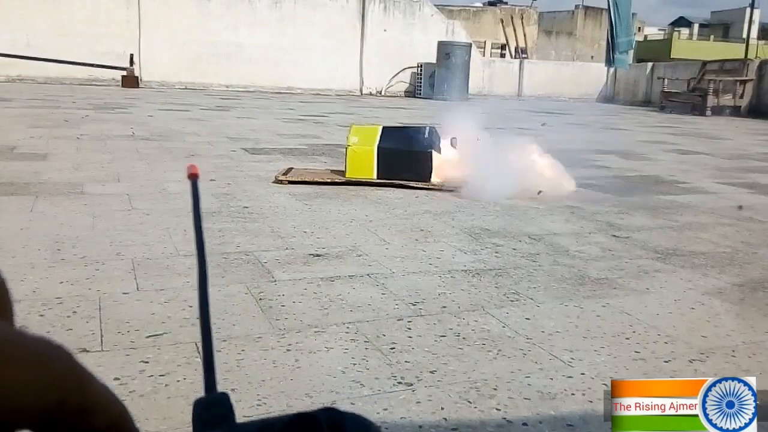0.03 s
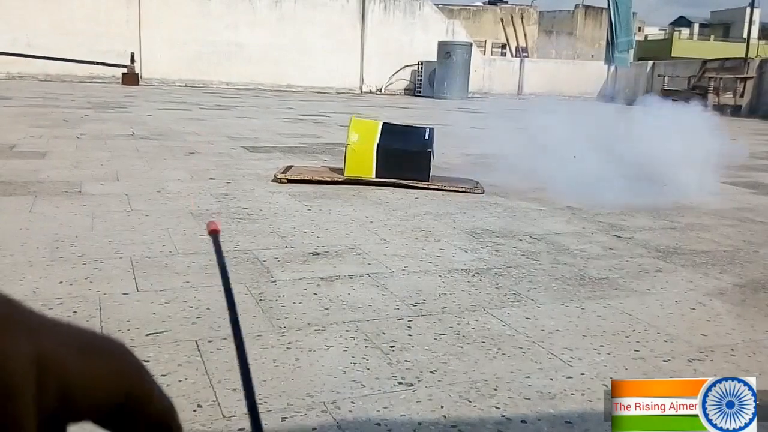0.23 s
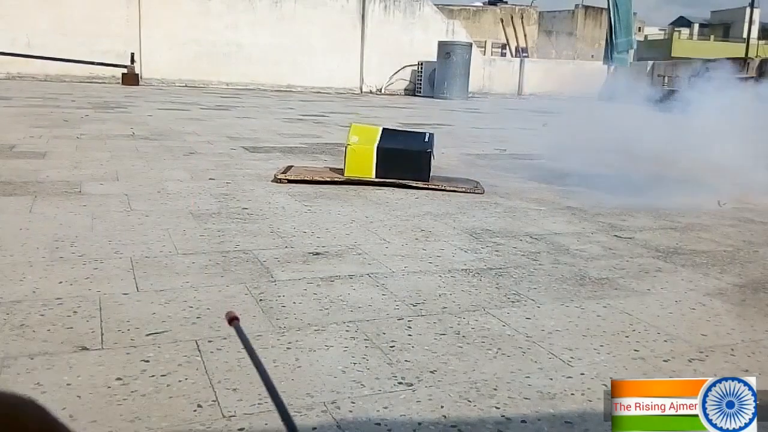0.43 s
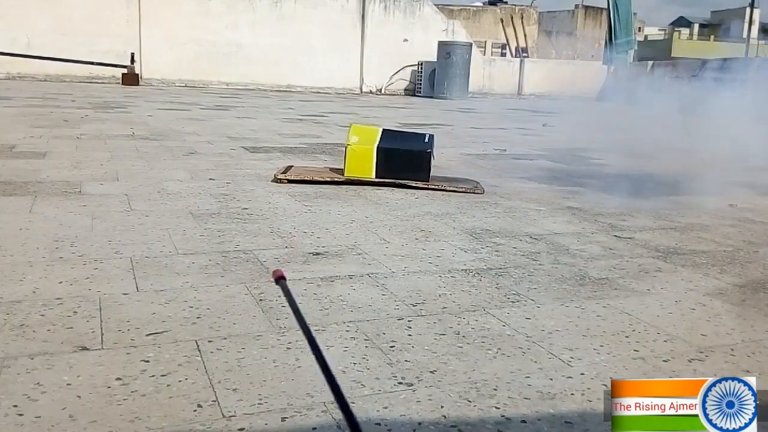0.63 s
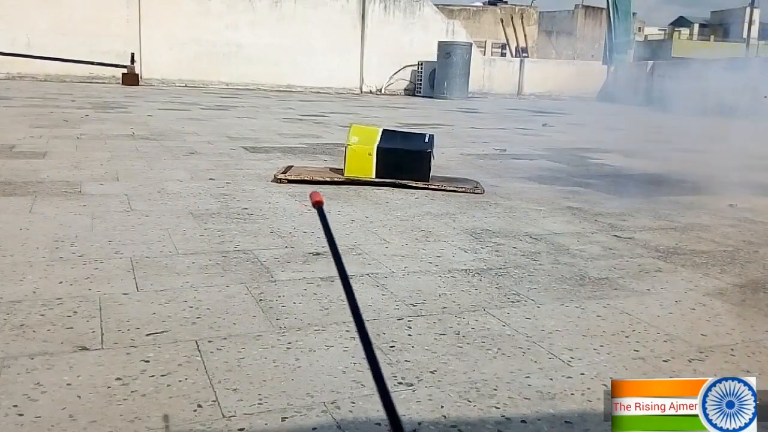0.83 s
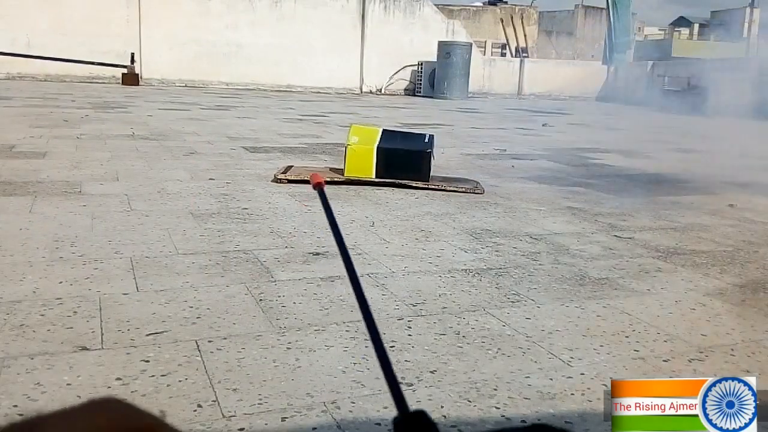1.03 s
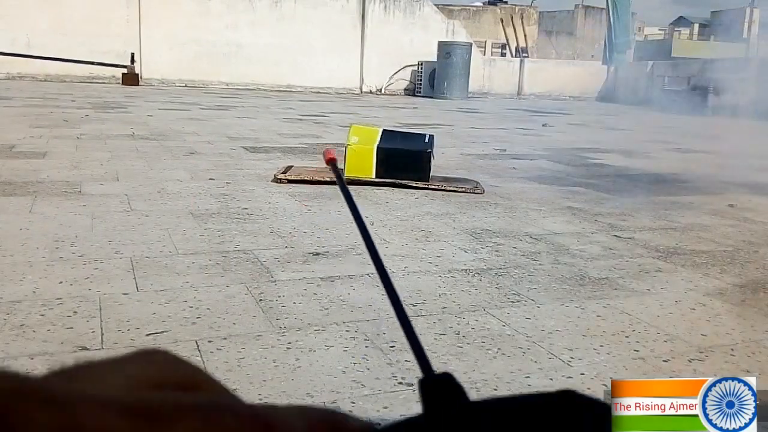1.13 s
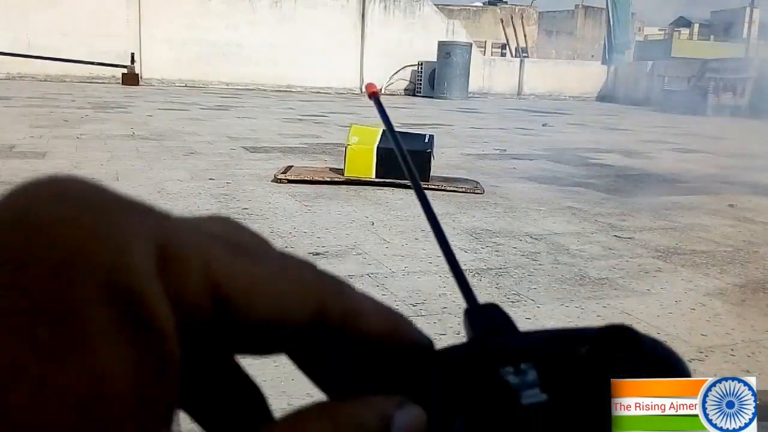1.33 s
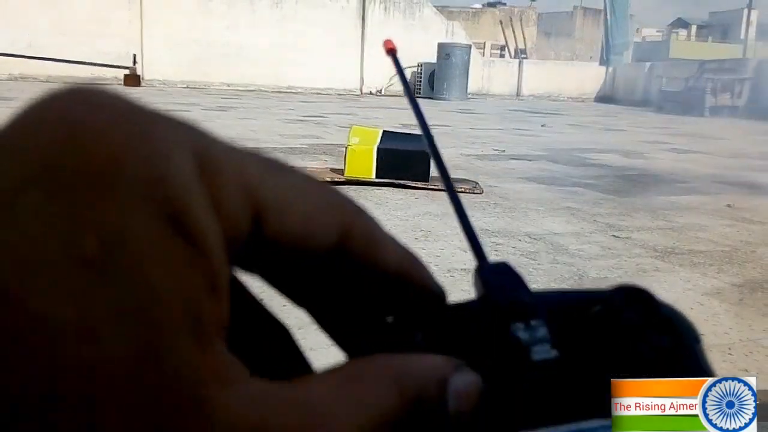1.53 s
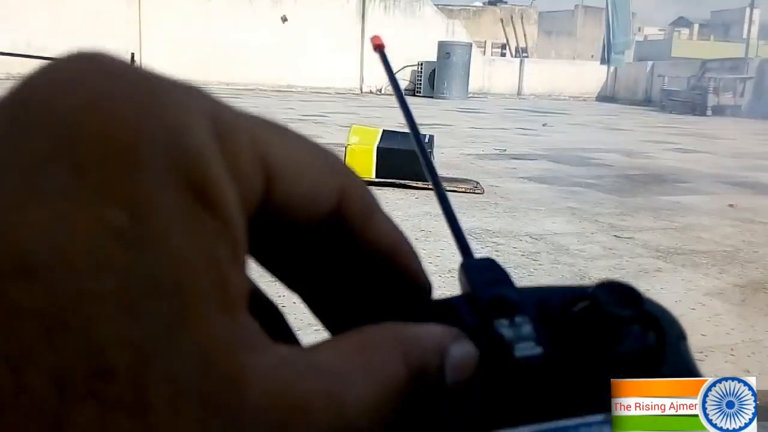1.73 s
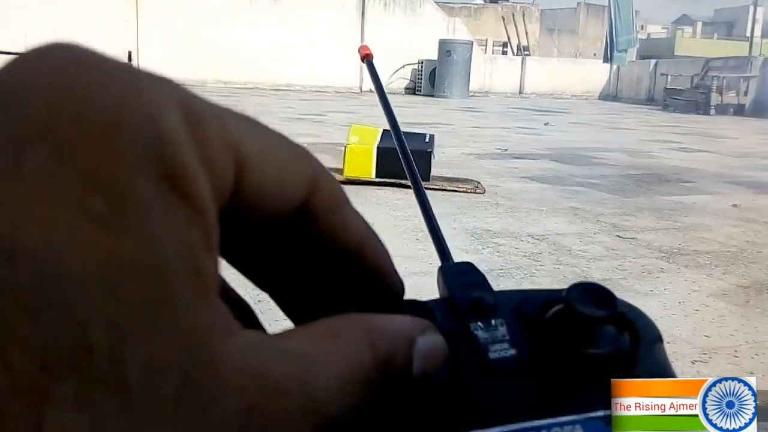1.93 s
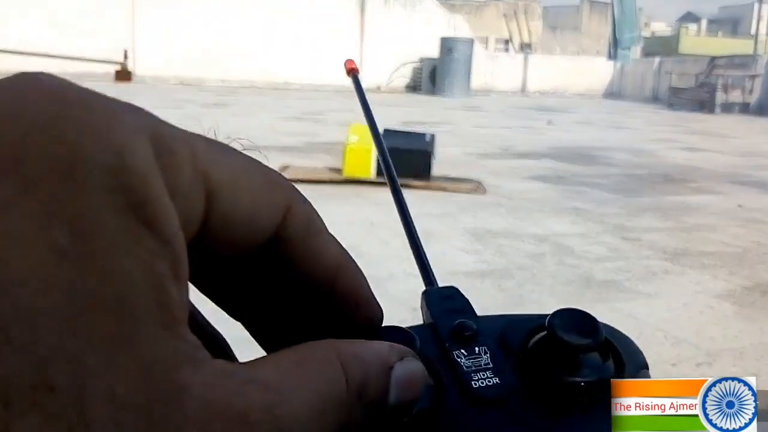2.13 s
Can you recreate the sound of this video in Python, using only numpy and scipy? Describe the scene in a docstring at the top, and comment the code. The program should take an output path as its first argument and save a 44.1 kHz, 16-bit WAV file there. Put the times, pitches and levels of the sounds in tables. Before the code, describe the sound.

A firecracker explodes on a flat roof after a brief, faint fuse hiss. The loud bang overloads the microphone a few metres away, then sharp cracks return from buildings and a rolling echo fades over the quiet town.

```python
"""Firecracker on a flat roof

A fuse hisses with a falling whistle, then a firecracker bursts a few metres from a phone.
The blast and its reflections from the parapets overload the microphone for a tenth of a second
while the pressure heaves. House fronts all over the town return cracks and a long rolling echo
that sinks into a quiet background."""
import sys
import numpy as np
from scipy import signal
from scipy.fft import rfft, irfft
from scipy.io import wavfile
from scipy.ndimage import uniform_filter1d

SR = 44100
rng = np.random.default_rng(int(sys.argv[2]) if len(sys.argv) > 2 else 0)


def store_wav(level_fs):
    """Save 16-bit WAV to argv[1]."""
    pcm = np.round(np.clip(np.atleast_2d(level_fs), -1, 1) * 32767)
    wavfile.write(sys.argv[1], SR, pcm.T.astype(np.int16))


N = 97020
TIME = np.arange(N) / SR
FREQS = np.fft.rfftfreq(N, 1 / SR)
BANG_S = .1665


def undb(db):
    """Amplitude ratio of a level in decibels."""
    return 10 ** (np.asarray(db) / 20)


def unit(x):
    """Normalisation to an rms of 1."""
    return x / np.sqrt(np.mean(x ** 2))


def on_log(hz, points):
    """Interpolation of (f/Hz, value) on a log-frequency axis."""
    f, v = np.array(points, float).T
    return np.interp(np.log(np.maximum(hz, 1)), np.log(f), v)


def colour(x, points):
    """Spectral shaping by (f/Hz, level/dB), at rms 1."""
    return unit(irfft(rfft(x) * undb(on_log(FREQS, points)), N))


def resonate(x, hz, width_hz, widen=2):
    """Two resonators in cascade, the second `widen` times as broad."""
    for width in (width_hz, widen * width_hz):
        x = signal.lfilter(*signal.iirpeak(hz, hz / width, fs=SR), x)
    return x


def burst(start, t60, hold=0):
    """Exponential decay after an instant attack and a hold; times in s."""
    age = TIME - start
    return (age >= 0) * np.exp(-np.log(1000) * np.maximum(age - hold, 0) / t60)


def bump(centre_s, spread_s):
    """Gaussian rise and fall around one moment."""
    return np.exp(-((TIME - centre_s) / spread_s) ** 2)


def tone(hz, waver_hz):
    """Random frequency modulation of a sine of rms 1."""
    pitch = hz + waver_hz * unit(uniform_filter1d(rng.standard_normal(N), size=60))
    return np.sqrt(2) * np.sin(2 * np.pi * np.cumsum(pitch) / SR)


def reflections(per_s=2600):
    """Diffuse field: echoes of random arrival time, strength and sign."""
    arrivals = rng.random(N) < per_s / SR
    strength = undb(np.minimum(rng.exponential(size=N), 4))
    return arrivals * strength * rng.choice([-1, 1], N)


# Spectrum of the town's background: f/Hz, level/dB
TOWN_SPECTRUM = [(25, -21), (70, -16.5), (120, 2.5), (220, -2.5), (500, -7), (1100, -8), (2200, -19),
                 (5000, -22), (7000, -33.5), (16000, -30)]
# Faint distant peeps: centre t/s, level/dB, f/Hz
FAR_PEEPS = [(.115, -60, 3400), (1.582, -58.5, 3400), (1.68, -71.5, 3460), (1.96, -68, 3180),
             (2.062, -65, 3450)]


def town():
    """Ambient noise: a steady floor with a few brief, wavering tones."""
    peeps = sum(undb(db) * bump(when, .028) * tone(hz, waver_hz=55) for when, db, hz in FAR_PEEPS)
    return undb(-53.5) * colour(rng.standard_normal(N), TOWN_SPECTRUM) + peeps


def far_block():
    """Diffuse reflection: a far block of houses returns a late, dull swell."""
    return undb(-39) * bump(1.557, .16) * unit(resonate(reflections(), hz=400, width_hz=160))


# Spectrum of the town's echo before it decays: f/Hz, level/dB
ROLL_SPECTRUM = [(25, -13), (55, -20), (90, -7.5), (150, 1), (230, 3), (330, -2), (520, -1.5), (750, -5.5),
                 (1100, -10), (1620, -13.5), (1850, -19.5), (2350, -19), (2750, -22), (4300, -24),
                 (5100, -23), (6500, -27.5), (8500, -43), (16000, -48)]
# Its reverberation time: f/Hz, T60/s
ROLL_DECAY = [(40, 2), (80, 2.33), (170, 2.01), (450, 2.795), (1200, 2.84), (2500, 2.54), (5500, 2.08)]
# Its swell about the steady decay: t/s, level/dB
ROLL_CONTOUR = [(.2, -31), (.36, -2.5), (.46, 2.5), (.62, 2), (.83, 4), (.98, 0.5), (1.1, 3), (1.33, 1),
                (1.58, 2), (1.8, 3.5), (2.15, 5.5)]


def rolling_echo():
    """Reverberation of the town: each octave decays at its own rate, and the bass builds up late."""
    spectrum = rfft(colour(reflections(), ROLL_SPECTRUM))
    octaves_hz = 31.25 * 2 ** np.arange(10)
    bass_rise = np.clip((TIME - BANG_S) / .54, 0, 1) ** 2
    roll = 0
    for hz, weights in zip(octaves_hz, np.eye(len(octaves_hz))):
        band = irfft(spectrum * on_log(FREQS, list(zip(octaves_hz, weights))), N)
        decay = burst(BANG_S, t60=on_log(hz, ROLL_DECAY))
        roll += band * decay * (bass_rise if hz < 100 else 1)
    swell_db = np.interp(TIME, *np.array(ROLL_CONTOUR).T)
    return roll * undb(-9.5 + swell_db)


def near_surface(x, delay_s=.00375):
    """Comb filtering: a surface close to the phone adds a faint delayed copy."""
    return x + undb(-26.5) * np.interp(TIME - delay_s, TIME, x)


# Sharp echoes from house fronts: t/s, peak level/dB, f/Hz, bandwidth/Hz, scattered amplitude
FRONT_SLAPS = [(.182, 5, 5200, 2500, .4), (.392, -7.5, 3500, 5000, .6), (.5475, -8, 5100, 2200, .5),
               (.715, -7.5, 5000, 3000, .4), (.7168, -11.5, 1204, 3000, .1), (.9365, -33, 3500, 3500, .3),
               (1.0237, -12, 1190, 1300, .1), (1.0245, -19.5, 4200, 3000, .5), (1.226, -29, 3250, 550, .5)]
# Dull echoes from far buildings: t/s, peak level/dB, f/Hz, bandwidth/Hz, scattered amplitude
FAR_THUDS = [(.39, -8, 450, 247, 0.27), (1.397, -29, 710, 600, 0.076), (1.551, -25.5, 419, 159, 0.06),
             (1.602, -54, 480, 300, .1), (1.8405, -31.5, 1000, 700, 0.25), (2.176, -36.5, 1130, 1000, 0.48)]


def single_echoes():
    """Specular reflection and scattering: each building returns a coloured pulse with a noisy tail."""
    echoes = 0
    for table, t60 in ((FRONT_SLAPS, .0053), (FAR_THUDS, .07)):
        for start, db, hz, width_hz, scattered in table:
            pulse = scattered * rng.standard_normal(N) * burst(start, t60)
            pulse[int(start * SR)] += 5  # the specular part
            echo = resonate(pulse, hz, width_hz)
            echoes += undb(db) * echo / np.abs(echo).max()
    return echoes


# Spectrum of the burning fuse: f/Hz, level/dB
FUSE_SPECTRUM = [(200, -7.5), (1200, -7.5), (2400, -2), (3700, 5.5), (5500, 1.5), (7000, -3.5),
                 (16000, -37)]


def fuse():
    """Combustion noise: a flare, then a hiss with a falling, fading whistle until the bang."""
    t = np.minimum(TIME, BANG_S)
    flare = undb(-52) * burst(0, t60=.018, hold=.04)
    hiss = colour(rng.standard_normal(N), FUSE_SPECTRUM) * (undb(-60) + flare)
    whistle = undb(-58 - 30.5 * t) * tone(hz=5230 - 19000 * t ** 2, waver_hz=120.3)
    return (hiss + whistle) * (t < BANG_S)


def big_wall():
    """Slap echo: a big wall nearby throws the blast back."""
    echo = unit(resonate(reflections(), hz=1387, width_hz=900))
    return undb(-1) * echo * burst(start=.2335, t60=.14)


# Spectrum of the reflections on the roof: f/Hz, level/dB
ROOF_SPECTRUM = [(30, -37), (80, -23.5), (170, -1), (400, 4), (700, 0), (1100, -7), (1600, -9),
                 (2600, -18.5), (5500, -19), (7000, -23), (16000, -38)]


def parapets():
    """Multiple reflection: the blast clatters between the parapets."""
    return undb(-2.5) * colour(reflections(), ROOF_SPECTRUM) * burst(BANG_S, t60=.45, hold=.086)


def heave():
    """Low-frequency oscillation: the pressure swings unevenly under a flat-topped envelope."""
    rumble = resonate(rng.standard_normal(N), hz=38.5, width_hz=40, widen=1)
    swings = np.cos(np.angle(signal.hilbert(rumble)))  # phase alone gives swings of equal size
    swell = np.exp(-((TIME - .234) / .056) ** 4) * (TIME > BANG_S)
    return undb(-11.5) * swings * swell


def thump():
    """Band-limited noise: the low body of the blast, held while the roof rings."""
    body = unit(resonate(rng.standard_normal(N), hz=102, width_hz=110))
    return undb(-9.5) * body * burst(BANG_S, t60=.06, hold=.1)


# Spectrum of the direct blast: f/Hz, level/dB
CRACK_SPECTRUM = [(60, -5), (300, -3.5), (1500, 1), (3000, -7), (5500, -5.5), (7000, -5.5), (16000, -34)]


def crack():
    """Direct sound: a first push of air, then a broadband impulse."""
    push = undb(-18) * bump(.1642, .001)
    noise = colour(rng.standard_normal(N), CRACK_SPECTRUM)
    return push + undb(12.5) * noise * burst(BANG_S, t60=.017, hold=.0011)


def scene():
    """Superposition at one microphone; both channels are alike."""
    roll = near_surface(rolling_echo() + far_block())
    blast = crack() + parapets() + big_wall() + heave() + thump()
    mono = roll + blast + single_echoes() + fuse() + town()
    return np.array([mono, mono])


def saturate(x, ceiling, knee):
    """Soft clipping: peaks flatten towards a ceiling; a higher knee is harder."""
    return x / (1 + np.abs(x / ceiling) ** knee) ** (1 / knee)


def record(dry):
    """Overload and band limiting: the microphone saturates and dulls the sound, then the phone clips."""
    mic_lowpass = signal.butter(12, 6590, fs=SR, output="sos")
    top_cut = signal.ellip(8, .2, 70, 16000, fs=SR, output="sos")
    mic = saturate(dry, ceiling=2.6, knee=2.5)
    dull = signal.sosfilt(mic_lowpass, mic) + undb(-29) * mic  # a little treble leaks through
    return signal.sosfilt(top_cut, saturate(dull, ceiling=1, knee=6))


dry = scene()
out = record(dry)
store_wav(out)
```